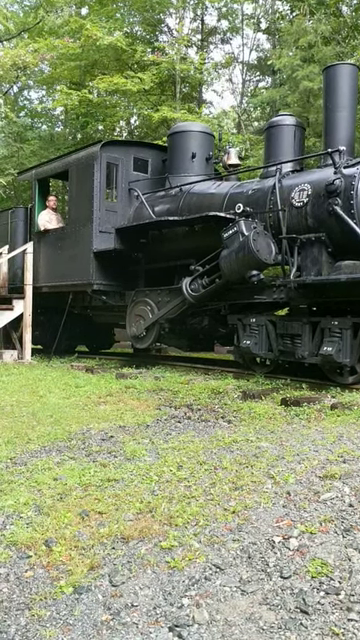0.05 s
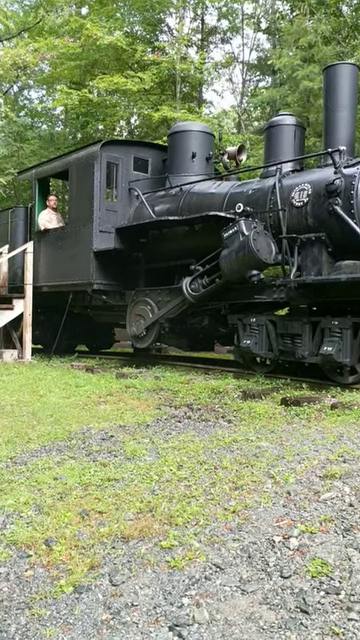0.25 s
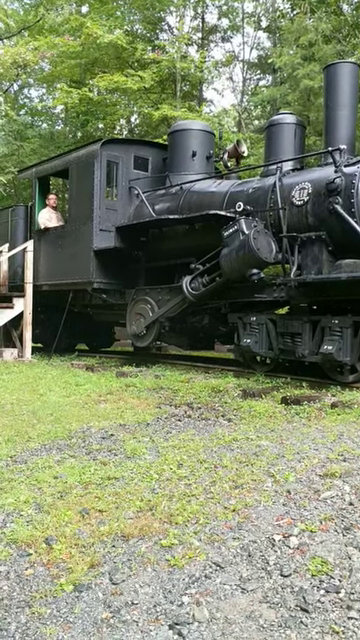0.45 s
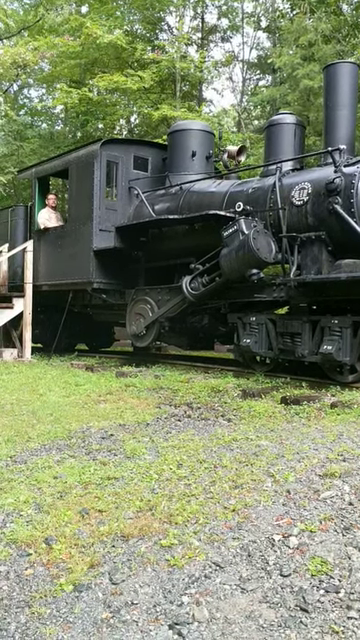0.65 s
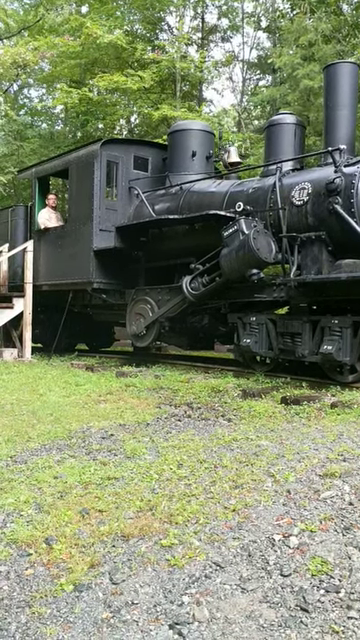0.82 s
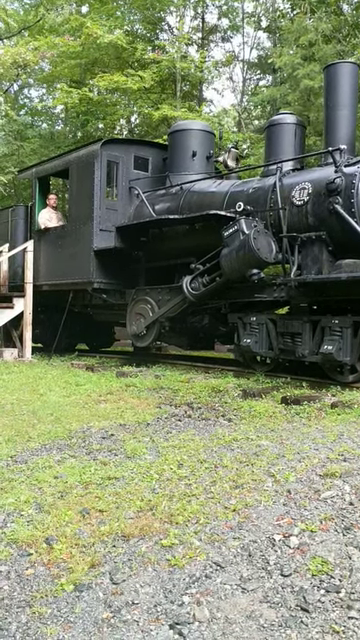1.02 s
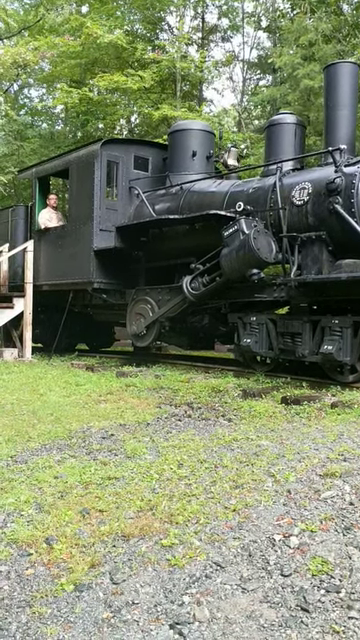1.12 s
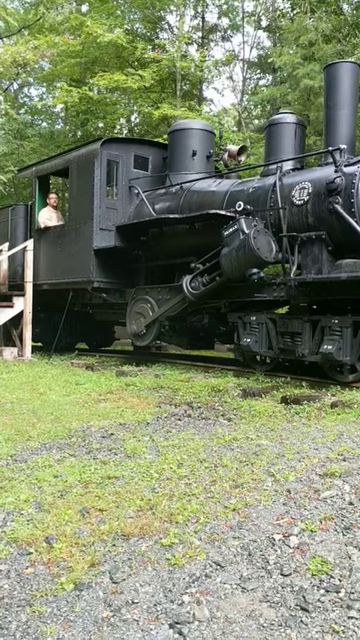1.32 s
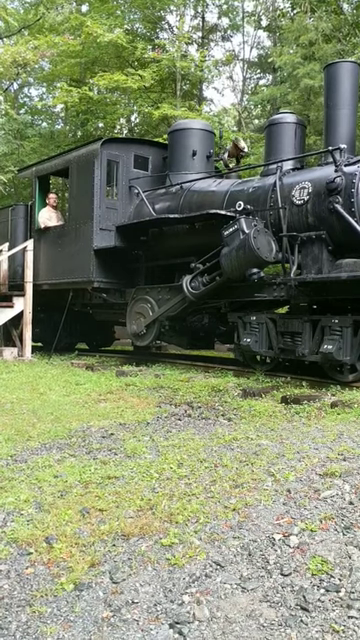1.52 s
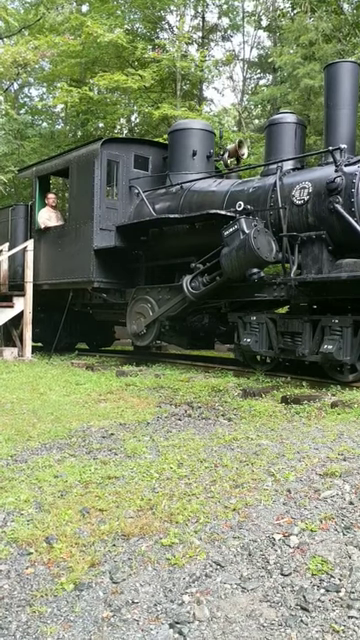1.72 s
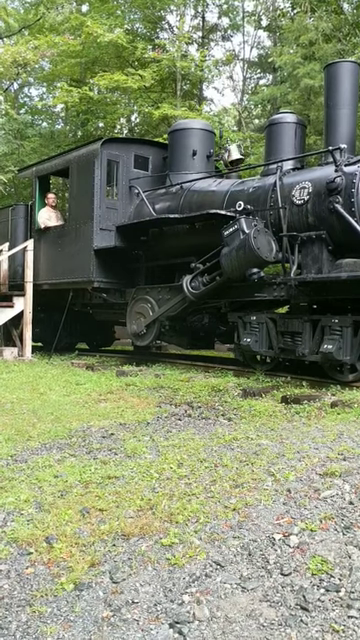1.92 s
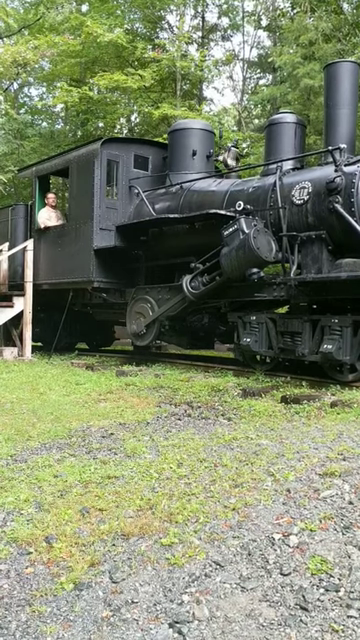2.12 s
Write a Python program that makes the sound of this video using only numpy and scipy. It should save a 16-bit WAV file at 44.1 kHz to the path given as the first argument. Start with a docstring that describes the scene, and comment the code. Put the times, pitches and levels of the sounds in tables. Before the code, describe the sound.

A swinging metal bell on a parked steam locomotive strikes twice, about a second apart. The clapper chatters after each hit, and the clear ring wavers and fades, with a soft echo from trees over faint outdoor rumble.

```python
"""A bronze bell swings on top of a parked steam locomotive, struck once on each side by its clapper.
The clapper bounces and chatters against the lip. Each tone of the bell swells and fades as the
turning bell sweeps its beams of sound past the listener, and throbs against a close twin tone.
The mount booms and knocks. Trees echo softly, over a low outdoor rumble and a faint insect."""
import sys
import numpy as np
from scipy import signal
from scipy.fft import rfft, irfft, next_fast_len
from scipy.io import wavfile

SR = 44100
rng = np.random.default_rng(int(sys.argv[2]) if len(sys.argv) > 2 else 0)


def file_out(sig):
    """Save sig as 16-bit WAV at sys.argv[1]."""
    # one column per channel
    cols = np.atleast_2d(sig).T
    # limit, then scale
    lim = np.clip(cols, -1, 1)
    pcm = np.round(lim * 32767).astype(np.int16)
    wavfile.write(sys.argv[1], SR, pcm)


N = 94815

# The two strikes. Each row: start in seconds, time that swing ends in seconds,
# boost of the shimmer in dB, boost of the clank in dB.
STRIKES = [(0.22, 0.598, -2, 6), (1.358, 1.796, 0.5, -5)]
SWING_PERIOD_S, ATTACK_S = 2.232, 0.0049


def amp(db):
    """Turn decibels into a gain to multiply by."""
    return 10 ** (np.asarray(db) / 20)


def unit(x):
    """Scale a signal to an average (rms) level of 1."""
    return x / np.sqrt(np.mean(np.abs(x) ** 2) + 1e-20)


def clock():
    """The time of every sample, in seconds."""
    return np.arange(N) / SR


def fade(start, ring_s, attack_s):
    """Rise from the start, then die away. The ring time is how long a 60 dB drop takes."""
    age = np.maximum(clock() - start, 0)
    return (1 - np.exp(-age / attack_s)) * np.exp(-np.log(1000) * age / ring_s)


def filtered(x, gain_at):
    """Multiply each frequency in x by gain_at(hz)."""
    size = next_fast_len(N + SR // 2)
    return irfft(rfft(x, size) * gain_at(np.fft.rfftfreq(size, 1 / SR)), size)[:N]


def noise(colour):
    """Noise at level 1, shaped by rows of frequency in Hz and relative level in dB."""
    points_hz, db = np.transpose(colour)
    white = rng.standard_normal(N)
    return unit(filtered(white, lambda hz: amp(np.interp(np.log(hz + 1), np.log(points_hz), db))))


def outdoors():
    """An uneven low rumble and a steady hiss of air."""
    # Each row: time in seconds, relative level of the rumble in dB.
    rumble_levels = [(0.0, -65), (0.35, -52.5), (1.04, -61), (1.24, -55.5), (1.29, -58.5), (1.59, -45),
                     (1.64, -50.5), (1.7, -48.5), (1.74, -55), (2.15, -58)]
    # The tone of the rumble and of the air. Each row: frequency in Hz, relative level in dB.
    rumble_colour = [(15, -54), (25, -32.5), (70, 0), (146, 0), (188, -8), (225, -4), (265, -17),
                     (301, -11), (342, -17), (379, -11), (520, -28), (680, -75), (1140, -120)]
    air_colour = [(100, -35.5), (400, -9), (700, -5), (1500, -4.5), (3000, -7), (4500, -9.5), (8000, -18),
                  (11000, -20.5), (15000, -22.5)]
    rumble_db = 3 + np.interp(clock(), *np.transpose(rumble_levels))
    return amp(rumble_db) * noise(rumble_colour) + amp(-60.5) * noise(air_colour)


def insect(centre_hz=9080, waver_hz=110, wavers_per_s=28, width_hz=330):
    """A faint insect: a thin band of noise whose pitch wavers quickly."""
    pitch = centre_hz + waver_hz * np.sin(2 * np.pi * wavers_per_s * clock())
    rasp = filtered(rng.standard_normal(N), lambda hz: np.exp(-(hz / width_hz) ** 2))
    return amp(-74) * unit(rasp * np.sin(2 * np.pi * np.cumsum(pitch) / SR))


def trees(sound):
    """The forest edge scatters the sound back as a soft, blurred echo."""
    tail = rng.standard_normal(N) * fade(0.025, ring_s=0.49, attack_s=0.089)
    return amp(-18.5) * signal.fftconvolve(sound, tail / np.linalg.norm(tail))[:N]


def mount(boom_hz=151.4):
    """The mount booms under each strike. Dull knocks, likely rope and yoke, come during the swing."""
    # Each row: start of a knock in seconds, boost in dB.
    knock_times = [(1.03, 9.5), (1.827, 5)]
    # The tones of a knock. Each row: pitch in Hz, level before the boost in dB, ring time in seconds.
    knock_tones = [(152.6, -44.5, 0.3), (350, -62, 0.22), (667, -53.5, 0.09)]
    t = clock()
    booms = sum(fade(start, ring_s=0.46, attack_s=0.032) * np.sin(2 * np.pi * boom_hz * (t - start))
                for start, *_ in STRIKES)
    knocks = sum(amp(db + boost) * fade(start, ring_s, 0.018) * np.sin(2 * np.pi * hz * (t - start))
                 for start, boost in knock_times for hz, db, ring_s in knock_tones)
    return amp(-36) * booms + knocks


def lingering(ring_s=2.24):
    """The bell still rings from the swing before, until the clapper lands again."""
    # Each row: pitch in Hz, starting level in dB.
    tones = [(875, -43), (1701, -57), (2103, -58.5), (3430, -56.5)]
    t = clock()
    ring = sum(amp(db) * np.sin(2 * np.pi * hz * t) for hz, db in tones)
    until_first_strike = 1 - fade(STRIKES[0][0], np.inf, ATTACK_S)
    return ring * np.exp(-np.log(1000) * t / ring_s) * until_first_strike


def clapper():
    """Each time the clapper hits the lip, it makes a crack with a quiet noisy tail."""
    # The blows and their bounces. Each row: start in seconds, relative level in dB.
    contacts = [(.2195, 0), (.279, -11), (.309, -17), (.345, -12), (.379, -14), (.437, -19), (.467, -15),
                (.497, -15), (.522, -18), (.575, -20), (1.357, 0), (1.408, -7), (1.463, -7), (1.494, -13),
                (1.526, -16), (1.555, -15), (1.584, -16), (1.608, -20)]
    # The tone of a crack. Each row: frequency in Hz, relative level in dB.
    colour = [(100, -34), (300, -1.5), (500, -16.5), (800, -0.5), (1050, -4.5), (1270, 2), (1480, -8),
              (2100, 6.5), (2850, -10.5), (3600, 6), (4500, -21.5), (6500, -9.5), (7800, -25.5),
              (9000, -18), (11000, -33.5), (15000, -33)]
    power = np.zeros(N)
    for start, db in contacts:
        crack = fade(start, ring_s=0.062, attack_s=0.00081)
        tail = amp(-20) * fade(start, ring_s=1, attack_s=0.0092)
        power += (amp(db) * (crack + tail)) ** 2
    return amp(-23.5) * np.sqrt(power) * noise(colour)


def clank(start, boost_db):
    """The clapper and the yoke (the bar the bell hangs from) ring briefly at a strike."""
    # Each row: pitch in Hz, level before the boost in dB, ring time in seconds.
    tones = [(1310, -39, 0.077), (1540, -49, .11), (1707, -25, 0.15), (2113, -14, 0.1), (2900, -63, 0.074),
             (3515, -26, 0.097), (3340, -49, .5)]
    age = clock() - start
    return sum(amp(db + boost_db) * fade(start, ring_s, ATTACK_S) * np.cos(2 * np.pi * hz * age)
               for hz, db, ring_s in tones)


def flutter(hz, rate_hz=24, depth=0.3, full_depth_hz=5000):
    """Shifting reflections shake the level and phase of a tone, the high tones most."""
    points = rng.standard_normal((2, int(N * rate_hz / SR) + 4))
    level, phase = (np.interp(clock() * rate_hz, np.arange(len(row)), row) for row in points)
    return 1 + depth * min(hz / full_depth_hz, 1) * (level + 1j * phase)


def bell_tone(hz, start, beam_angle, depth, throb_hz, dip_s):
    """One tone, sent out in turning beams, throbs against a weaker twin a few Hz higher."""
    age = clock() - start
    beams = np.cos(beam_angle) + 0.069j  # a little sound remains between two beams
    throb = 1 - depth * np.exp(2j * np.pi * throb_hz * (age - dip_s))
    wave = np.exp(2j * np.pi * (hz - depth * throb_hz / 2) * age)
    return np.imag(beams * throb * flutter(hz) * wave)


def shimmer(start, tilt, boost_db, sweep_rad=2.6, typical_throb_hz=8.35):
    """The bell's highest tones, each with a random beam direction and throb."""
    # Each row: pitch in Hz, relative level in dB.
    tones = [(5636, -65), (6584, -64), (7144, -57), (7343, -51.5), (8495, -69), (8737, -53.5),
             (8888, -52.5), (9388, -91), (9825, -76.5), (10713, -63), (10928, -63), (11273, -68),
             (11746, -71), (12791, -72), (13006, -65), (13345, -67)]
    ring = np.zeros(N)
    for hz, db in tones:
        direction, pace, dip_s = rng.random(3)
        angle = np.pi * direction - sweep_rad * tilt
        throb_hz = typical_throb_hz * (0.5 + pace)
        ring += amp(db) * bell_tone(hz, start, angle, depth=0.49, throb_hz=throb_hz, dip_s=dip_s)
    return amp(boost_db - 0.5) * fade(start, ring_s=1.35, attack_s=ATTACK_S) * ring


def bell():
    """Each strike on the swinging bell sets off its long tones, a high shimmer and a short clank."""
    # Each row: pitch in Hz, ring time in seconds, beam turn in radians per unit of tilt, throb depth
    # from 0 to 1. Then four numbers for each side: relative level in dB, beam angle in radians,
    # throb rate in Hz, seconds from the strike to a dip of the throb.
    long_tones = [(874, 1.235, 3.69, 0.43, -26.5, 2.5, 3.18, 0.2, -23.5, 2.75, 2.4, 0.15),
                  (1701.5, 2.5, 6.4, .5, -31.5, 2.09, 7.2, .005, -32, .84, 6.3, .113),
                  (2104, 1.036, 3.9, 0.59, -18.5, 1.08, 8.03, 0.082, -20, 2.62, 9.15, 0.04),
                  (2467, 1.38, 2.1, 0.4, -35.5, 2.5, 5.06, 0.037, -37.5, 2.99, 7.2, 0.073),
                  (3429, 1.6, 10, .45, -26, 2.72, 7.8, .035, -26.5, 1.36, 6.5, .125),
                  (3893, 1.03, 3.35, 0.45, -32.5, 0.2, 4.5, 0.2, -27, 1.4, 10.7, 0.024),
                  (3994, 1.37, 2.36, 0.22, -35, 2, 4.8, 0.039, -37.5, 0.47, 3.76, 0.1),
                  (5024.4, 1.253, 0.99, 0.79, -23.5, 2, 6.74, 0.042, -33.5, 1.16, 8.78, 0.025),
                  (5131, 1.49, 4.6, 0.59, -40.5, 2, 6.7, 0.035, -44.5, 0.98, 4.1, .13),
                  (5325, 1.4, 2.6, 0.86, -44, 1.5, 5.4, 0.22, -49.5, 0.77, 11, .042),
                  (6349, 1.05, 3.25, 0.59, -50, 2.5, 4.1, .019, -49.5, 1.23, 5.45, 0.12),
                  (6825, 1.136, 3.9, 0.53, -37, 0, 2.9, .18, -44, .63, 8.35, 0.038)]
    sound = np.zeros(N)
    for side, (start, end_s, shimmer_db, clank_db) in enumerate(STRIKES):
        # Tilt is 0 at the end of this swing and 2 at the opposite end.
        tilt = 1 - np.cos(2 * np.pi * (clock() - end_s) / SWING_PERIOD_S)
        mouth_gain = amp(4 * np.exp(-tilt / 0.3))  # the raised mouth throws out more sound
        for hz, ring_s, sweep, depth, *sides in long_tones:
            db, angle, throb_hz, dip_s = np.reshape(sides, (2, -1))[side]
            tone = bell_tone(hz, start, angle - sweep * tilt, depth, throb_hz, dip_s)
            sound += mouth_gain * amp(db) * fade(start, ring_s, ATTACK_S) * tone
        sound += shimmer(start, tilt, shimmer_db) + clank(start, clank_db)
    return sound


def scene():
    """The bell, its echo and its mount, over the sounds of the clearing."""
    metal = bell() + lingering() + clapper()
    return (metal + trees(metal) + mount() + outdoors() + insect())[None]


def record(dry):
    """Cut away the very highest treble."""
    top_hz = 15550
    return filtered(dry[0], lambda hz: hz < top_hz)[None]


dry = scene()
out = record(dry)
file_out(out)
```